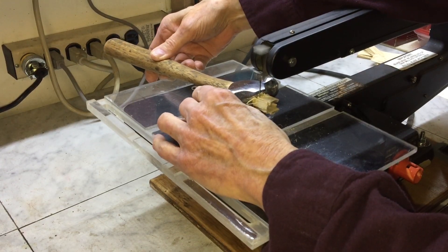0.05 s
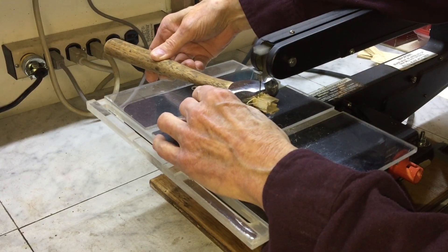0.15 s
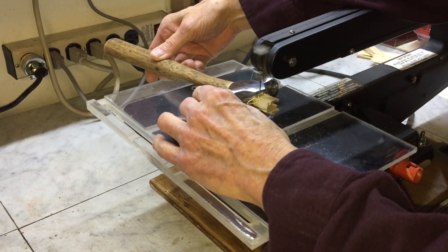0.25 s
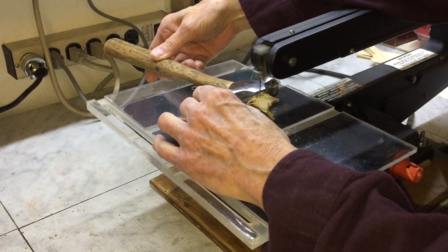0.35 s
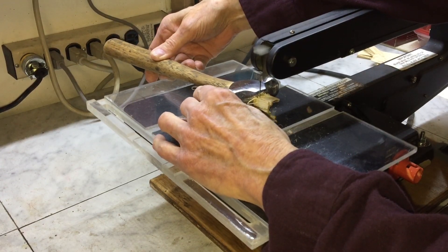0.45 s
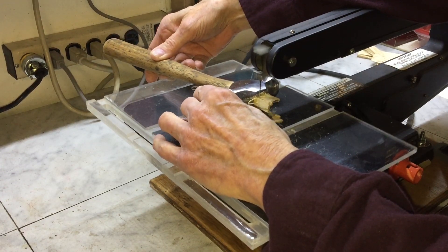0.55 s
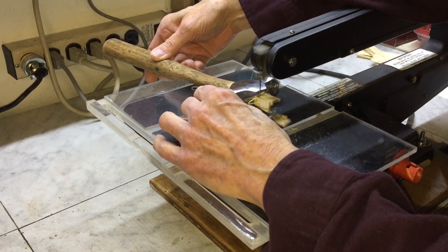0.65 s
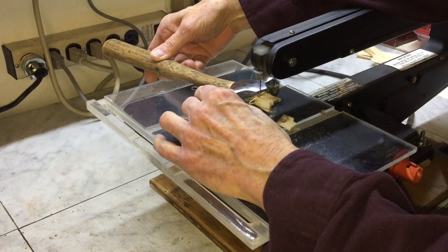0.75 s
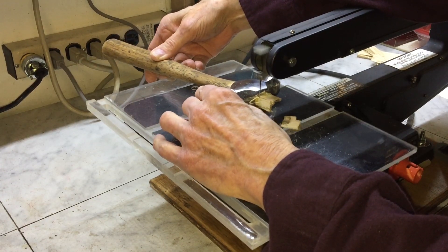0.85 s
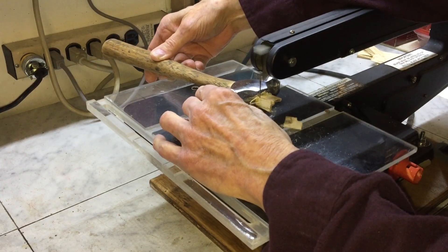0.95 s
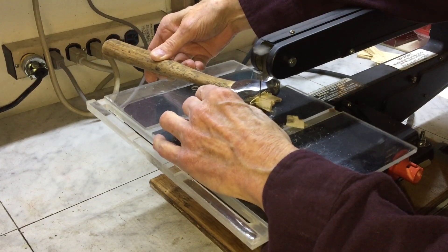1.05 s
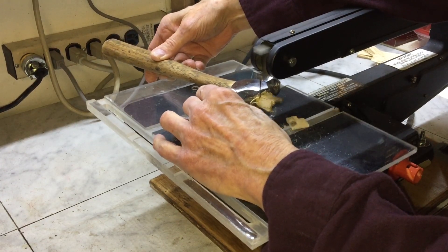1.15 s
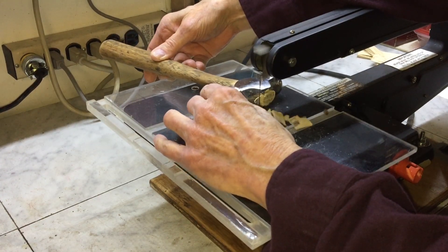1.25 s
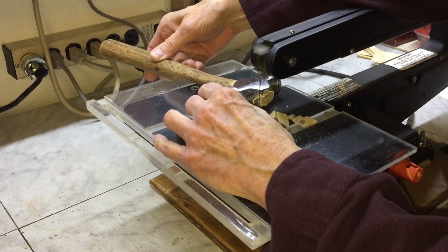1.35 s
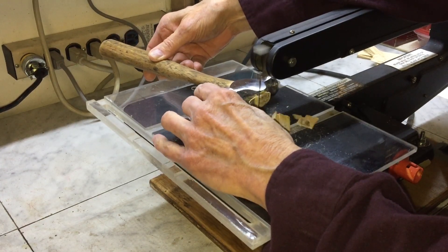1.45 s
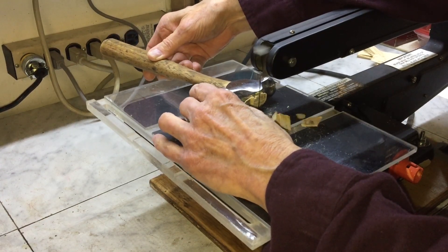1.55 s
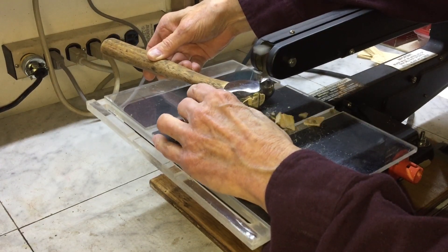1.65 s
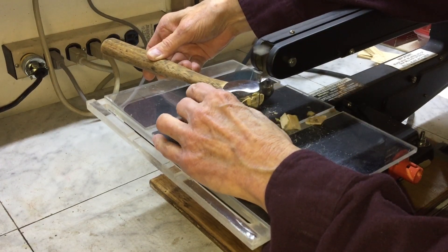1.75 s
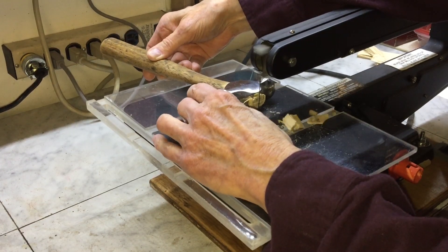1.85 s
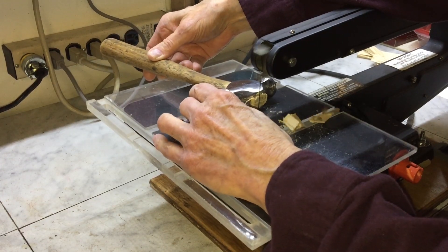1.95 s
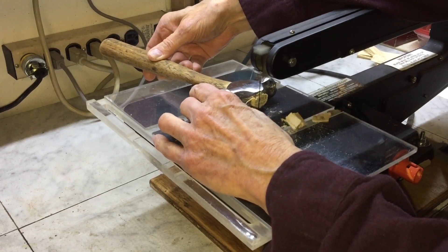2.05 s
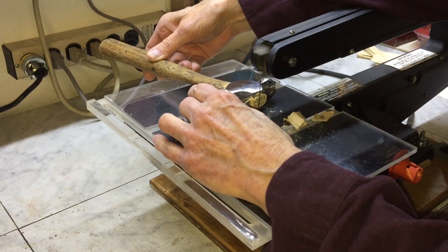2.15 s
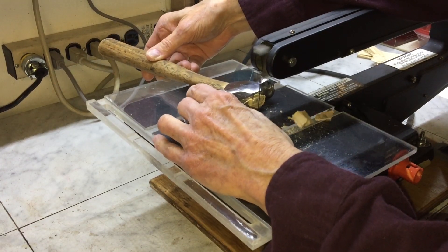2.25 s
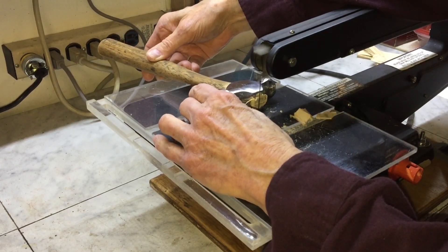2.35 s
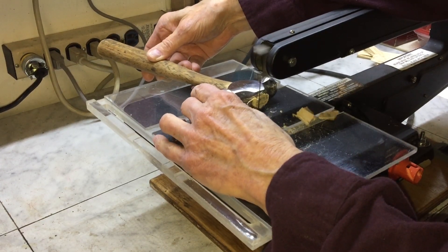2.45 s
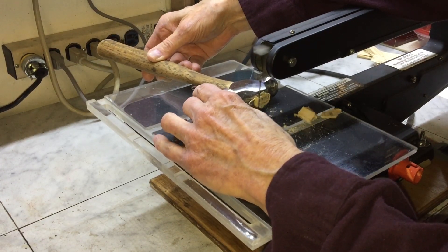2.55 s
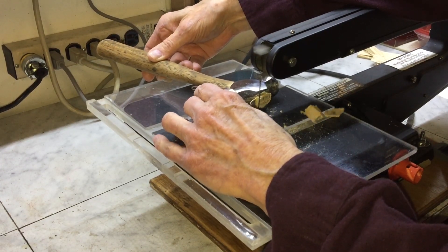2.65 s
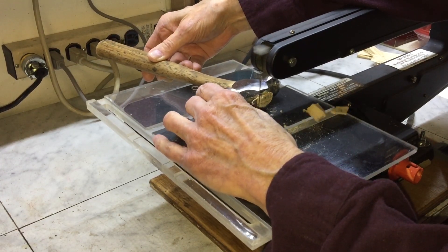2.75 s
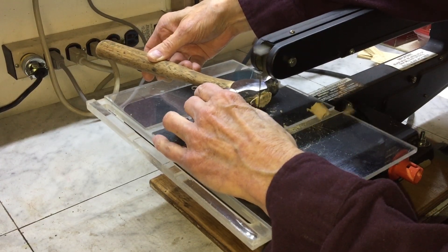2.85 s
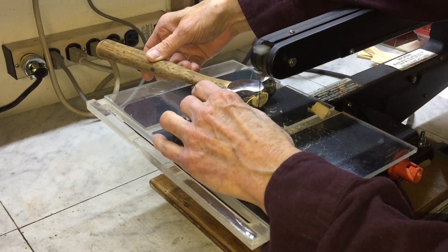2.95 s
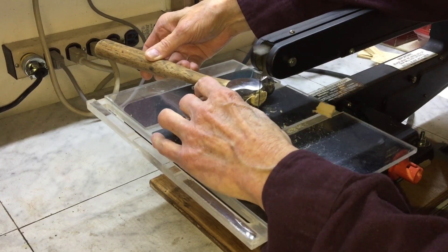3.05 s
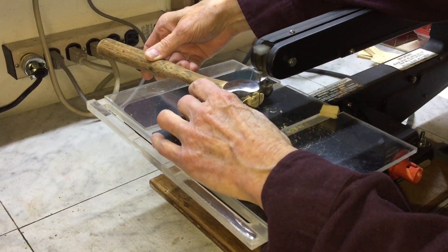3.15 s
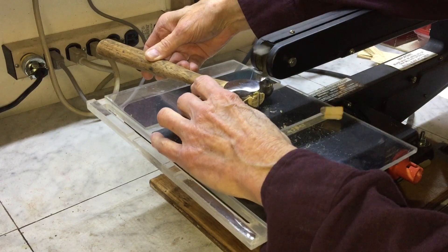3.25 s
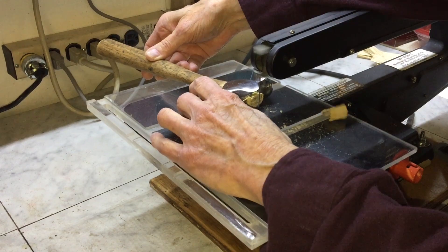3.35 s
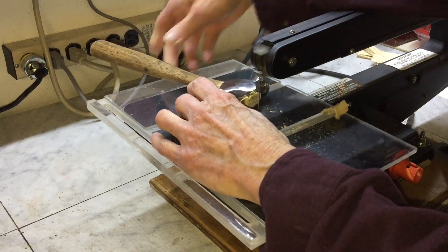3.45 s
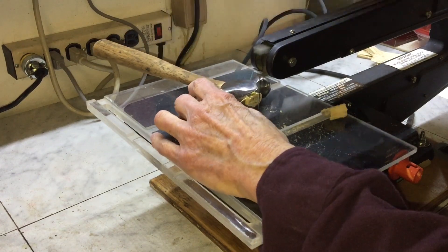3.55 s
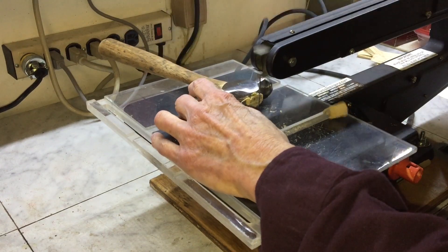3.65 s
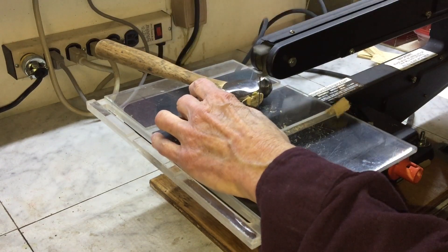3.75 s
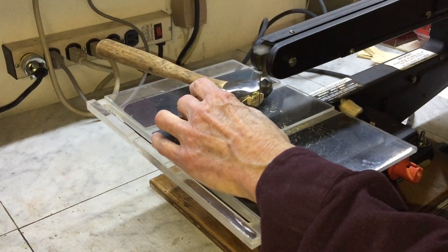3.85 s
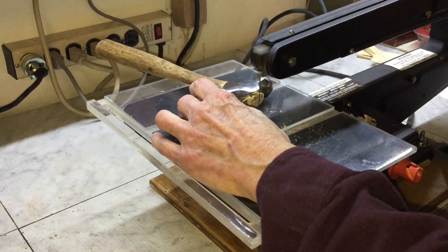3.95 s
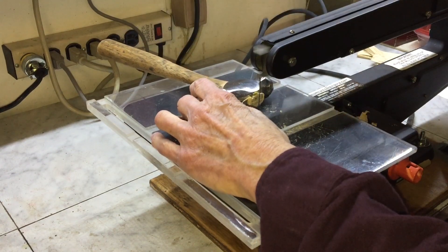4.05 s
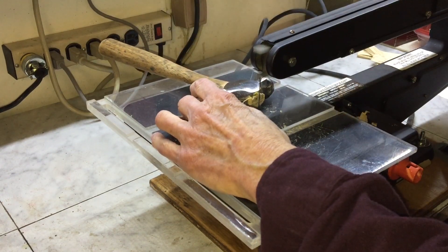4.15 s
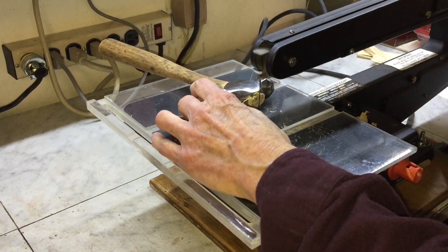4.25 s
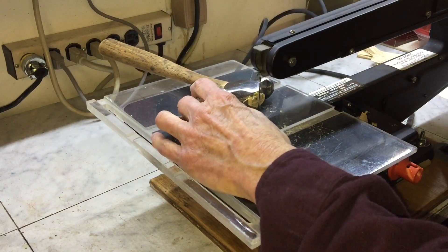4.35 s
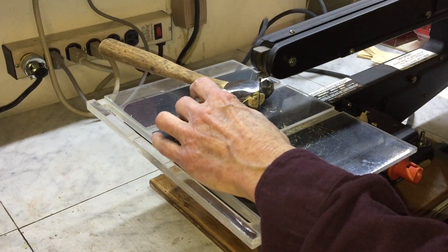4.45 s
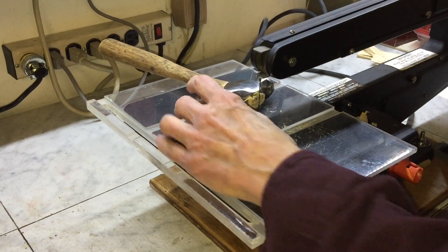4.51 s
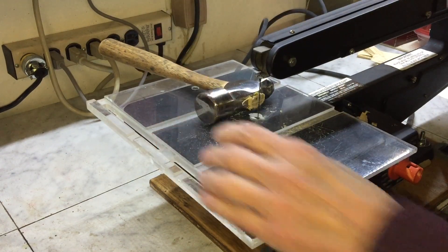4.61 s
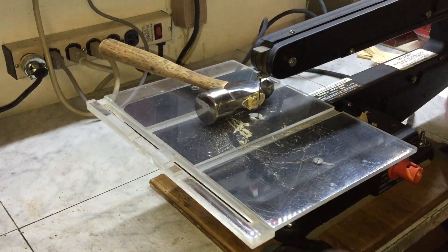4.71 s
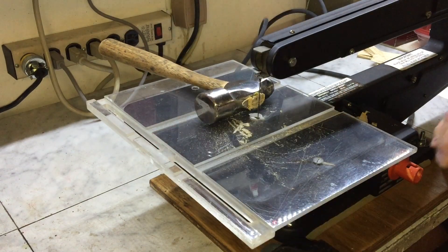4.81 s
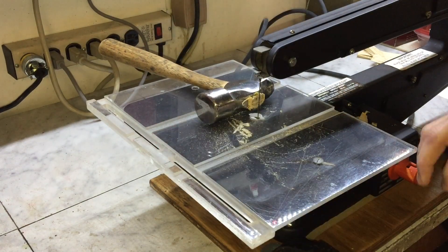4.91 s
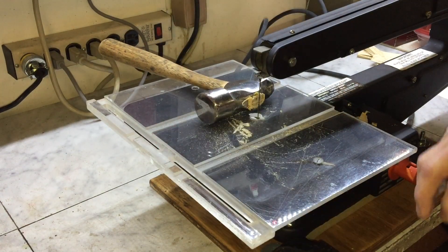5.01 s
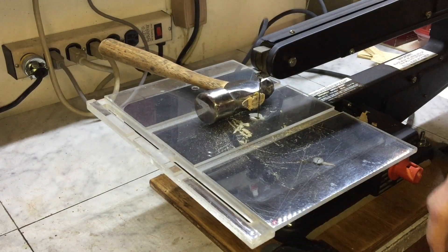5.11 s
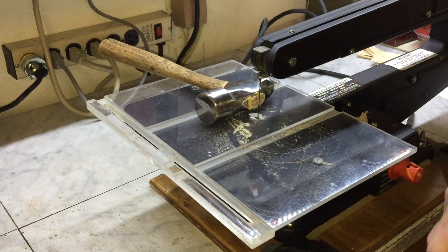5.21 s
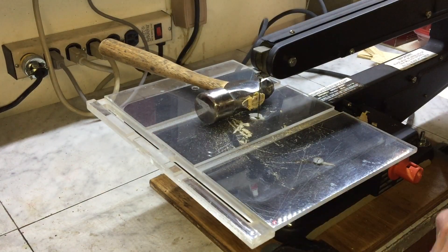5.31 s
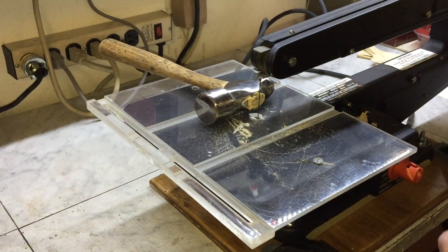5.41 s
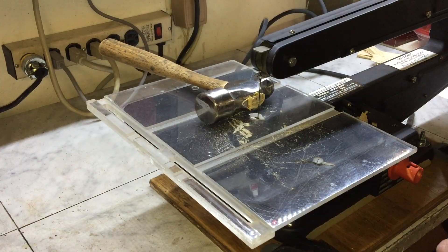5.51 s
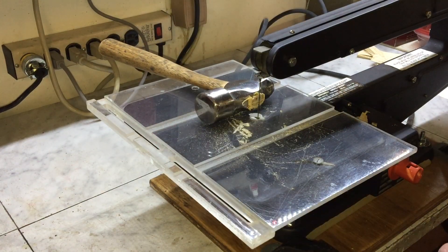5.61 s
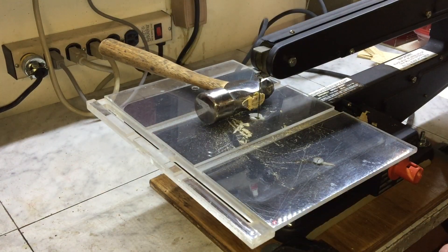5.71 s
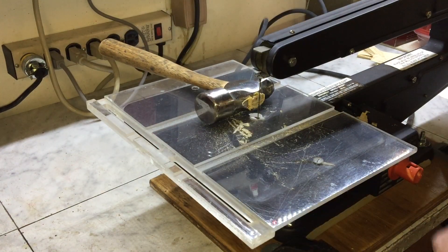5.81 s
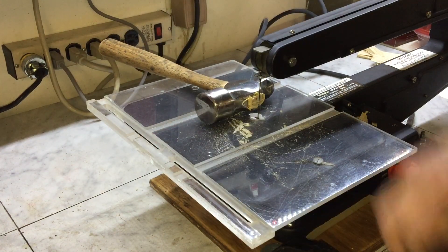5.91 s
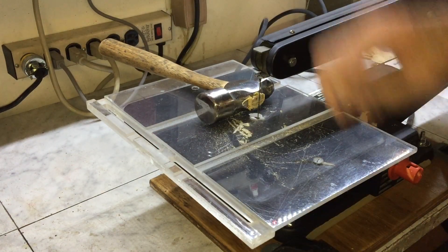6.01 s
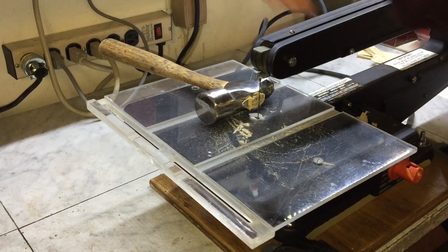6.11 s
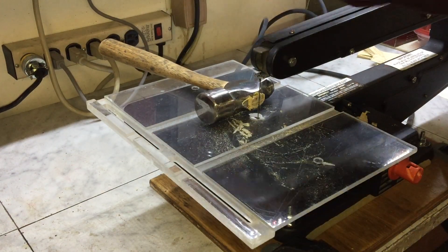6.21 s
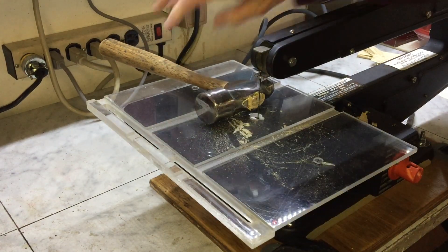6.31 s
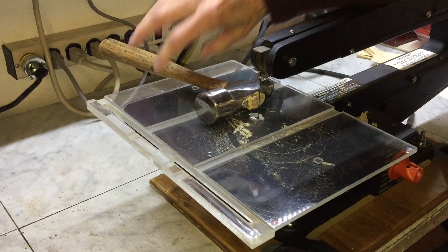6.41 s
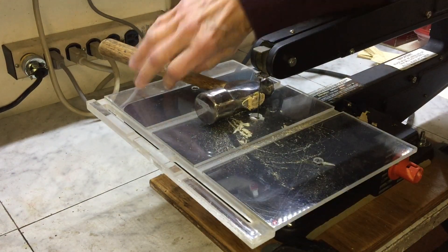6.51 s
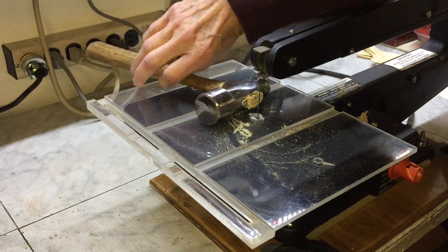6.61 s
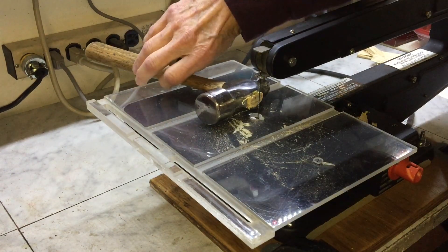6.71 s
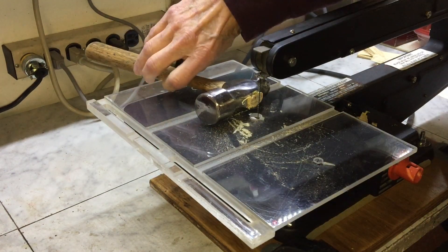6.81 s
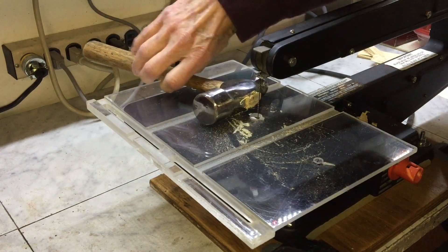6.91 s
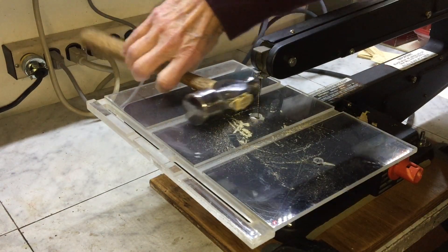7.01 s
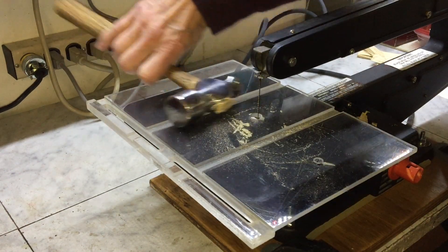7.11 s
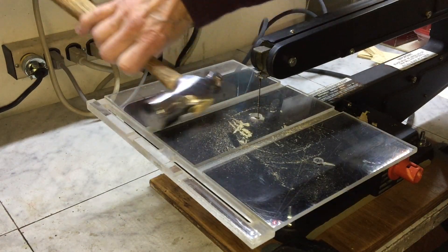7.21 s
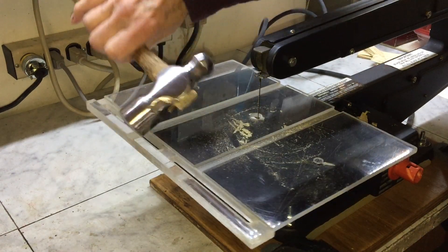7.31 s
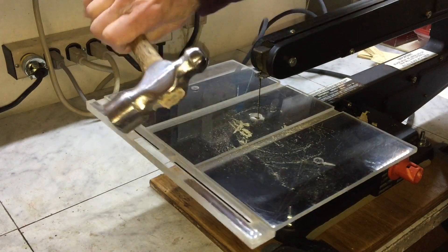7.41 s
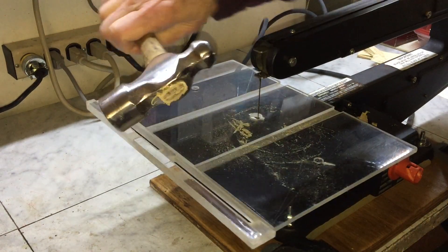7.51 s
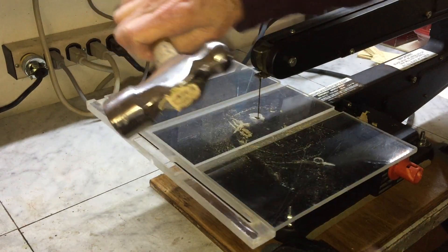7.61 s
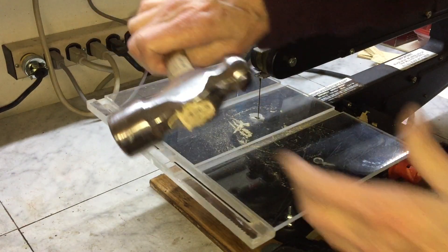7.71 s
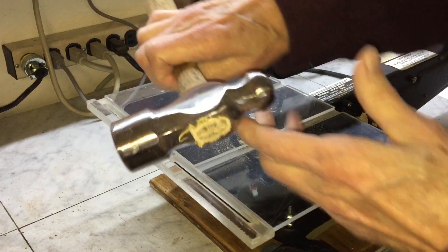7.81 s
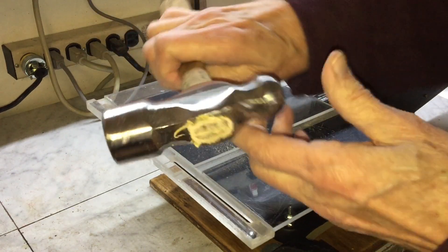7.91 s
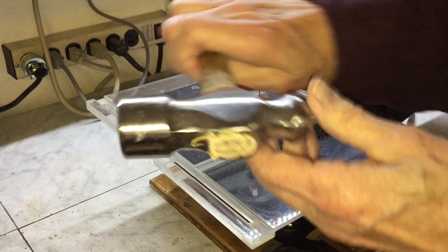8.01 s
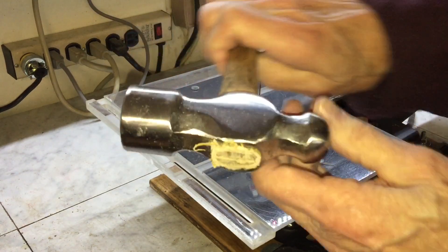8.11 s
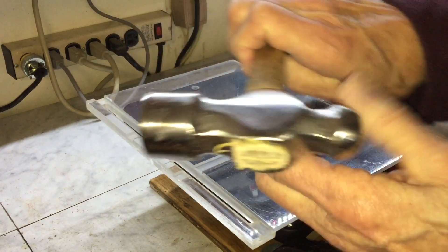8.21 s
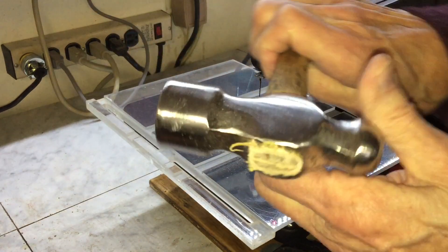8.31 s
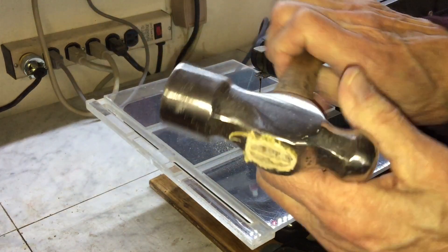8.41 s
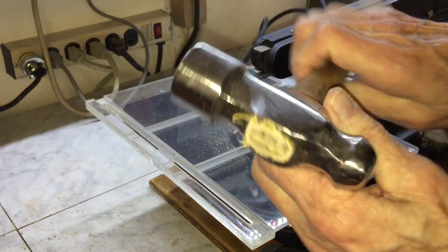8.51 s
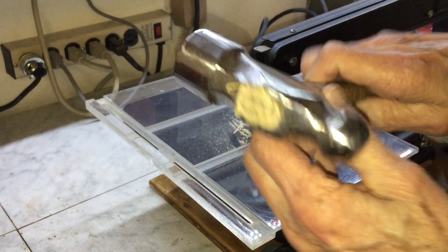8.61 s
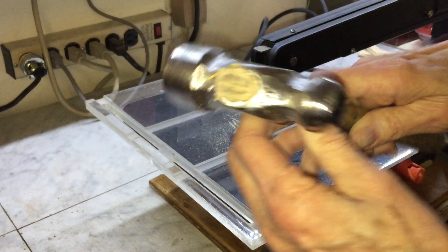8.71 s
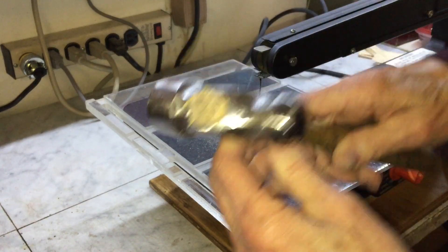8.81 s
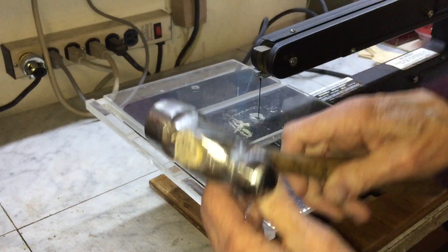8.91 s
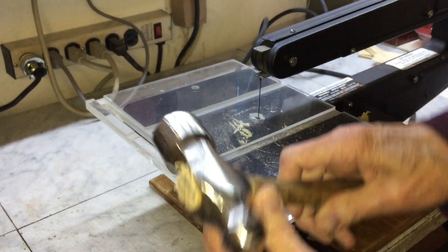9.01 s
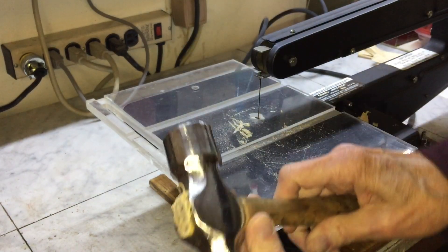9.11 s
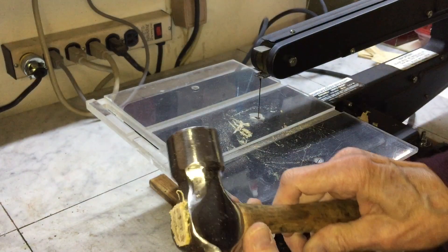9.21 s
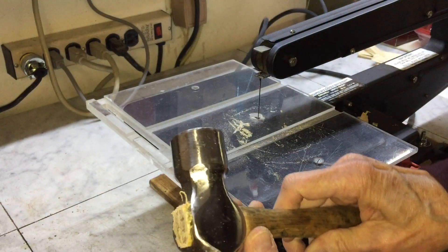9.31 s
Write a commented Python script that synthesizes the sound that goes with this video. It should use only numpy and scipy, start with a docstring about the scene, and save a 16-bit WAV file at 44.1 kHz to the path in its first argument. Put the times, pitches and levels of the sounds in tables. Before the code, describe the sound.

A small benchtop scroll saw buzzes and rattles through wood, breaks free, switches off and winds down fast; later a hammer scrapes and knocks on the table.

```python
"""Small workshop: a benchtop scroll saw trims the wooden stub off a hammer's handle.
Motor harmonics whine, filtered noise pulsing with the strokes is the rattle, a noise burst a stroke is the slap.
The blade breaks through, the saw runs free, is switched off and coasts to rest within half a second.
Then the hammer is dragged off the table as noise and gliding groans, knocks against it as decaying noise
and ringing modes, and is turned over in the hands; switches click, under faint room tone."""
import sys
import numpy as np
from scipy import signal
from scipy.fft import rfft, irfft
from scipy.io import wavfile
from scipy.ndimage import uniform_filter1d

SR = 44100
rng = np.random.default_rng(int(sys.argv[2]) if len(sys.argv) > 2 else 0)


def waveform_to_disk(signal):
    """Save audio, clipped to [-1, 1], as 16-bit WAV at the path in sys.argv[1]."""
    frames = np.transpose(np.atleast_2d(signal))
    scaled = np.clip(frames, -1, 1) * 32767
    samples = np.round(scaled).astype(np.int16)
    wavfile.write(sys.argv[1], SR, samples)


N = 412776
TIME = np.arange(N) / SR

# blade strokes per s, up and down both counted, and how many of them the wood takes away
FREE_HZ, SAG_HZ = 114.6, 1.14
MAINS_PULL_HZ = 120
POWER_OFF_S = 4.097

# arms and bearings, noise spectrum: (frequency [Hz], relative density [dB])
RATTLE_SPECTRUM = [(30, -25), (75, -21.5), (130, -13), (260, -12.5), (380, -2.5), (500, -6.5), (720, 1),
                   (950, -5.5), (1250, 1.5), (1800, 1.5), (2300, -2), (3000, 0), (4200, -6), (6000, -10.5),
                   (9000, -39.5)]
# saw frame resonances: (frequency [Hz], width [Hz], boost or cut [dB])
FRAME = [(179, 2.5, 4.5), (342, 13, 9.5), (405, 29, 6), (558.5, 10, 8), (723, 16, 4.5), (811, 19, 5.5),
         (1205, 63, 1.5), (1385, 27, 3), (1690, 40, -3.5), (1744, 57, 3.5), (1819, 60, 2.5),
         (2220, 50.2, -3.5), (2440, 32, -4.5), (2540, 68, 4), (2760, 90, -3.5), (2890, 220, 5),
         (3200, 120, -5), (3660, 170, 3), (4080, 90, -6.5), (4190, 90, 0.5), (4670, 56, 0.5), (4760, 91, 4),
         (5270, 170, -2.5)]


def from_db(db):
    """Decibels to gain."""
    return 10 ** (np.asarray(db) / 20)


def rms_one(x):
    """Scale to rms 1."""
    return x / np.sqrt(np.mean(x ** 2) + 1e-20)


def in_time(rows):
    """Each column of a curve at every sample."""
    s, *columns = np.transpose(rows)
    return [np.interp(TIME, s, column) for column in columns]


def at_hz(points, hz):
    """Read a table on a log-frequency axis."""
    table_hz, values = np.array(points).T
    return np.interp(np.log(hz + 1e-3), np.log(table_hz), values)


def onset(start_s, length_s):
    """Rise from 0 to 1 in a straight line."""
    return np.clip((TIME - start_s) / length_s, 0, 1)


def spell(start_s, end_s, edge_s):
    """1 between start and end, 0 outside, with sloping edges."""
    return onset(start_s - edge_s / 2, edge_s) * (1 - onset(end_s - edge_s / 2, edge_s))


def bump(s, scale_s):
    """Gaussian swell of height 1."""
    return np.exp(-((TIME - s) / scale_s) ** 2)


def hiss():
    """White noise."""
    return rng.standard_normal(N)


def drift(rate_hz):
    """Random wander around 0: straight lines between normal draws, holding the last of 4096."""
    knots = rng.standard_normal(4096)
    return np.interp(TIME * rate_hz, np.arange(len(knots)), knots)


def band(x, low_hz, high_hz, order=2):
    """Butterworth band-pass."""
    edges_hz = [low_hz, min(high_hz, .45 * SR)]
    return signal.sosfilt(signal.butter(order, edges_hz, "band", fs=SR, output="sos"), x + 1e-18)


def colour(x, spectrum, size=8192):
    """Minimum-phase filter with the given spectrum; white noise keeps its power."""
    bins_hz = np.arange(size // 2 + 1) * SR / size
    magnitude = rms_one(from_db(at_hz(spectrum, bins_hz)))
    cepstrum = irfft(np.log(magnitude))
    cepstrum[1:size // 2] *= 2
    cepstrum[size // 2 + 1:] = 0
    return signal.oaconvolve(x, irfft(np.exp(rfft(cepstrum))))[:len(x)]


def resonate(x, hz, width_hz):
    """Two-pole resonance with gain 1 on top."""
    r = np.exp(-np.pi * width_hz / SR)
    poles = [1, -2 * r * np.cos(2 * np.pi * hz / SR), r * r]
    return signal.lfilter([(1 - r * r) / 2, 0, (r * r - 1) / 2], poles, x + 1e-18)


def resonances(x, table):
    """Lift or hollow the sound at each resonance of a body."""
    return x + sum((from_db(db) - 1) * resonate(x, hz, width_hz) for hz, width_hz, db in table)


def clicks(times_s, levels_db):
    """One impulse for each event."""
    out = np.zeros(N)
    out[np.round(np.asarray(times_s) * SR).astype(int)] = from_db(levels_db)
    return out


def fade(impulses, decay_s):
    """Each impulse starts an exponential decay of its own height."""
    return signal.lfilter([1], [1, -np.exp(-1 / (decay_s * SR))], impulses + 1e-18)


def ring(impulses, hz, t60_s):
    """A unit impulse sets a decaying sine of initial height 1 ringing."""
    r, w = from_db(-60 / (t60_s * SR)), 2 * np.pi * hz / SR
    return signal.lfilter([0, np.sin(w)], [1, -2 * r * np.cos(w), r * r], impulses + 1e-18)


def each_stroke(strokes):
    """Samples at which a new stroke begins."""
    return np.flatnonzero(np.diff(np.maximum.accumulate(np.floor(strokes))) > 0)


def saw(slide=0.14, loose_slide=0.23):
    """Speed and load drive every part of the machine."""
    # part levels: (running free [relative dB], added in wood [dB], added with power off [dB],
    # power of the speed that the level follows [-])
    rumble_law = (-33, 2, 0.5, 1.63)
    rattle_law = (-28, 0.1, -7, 1)
    slap_law = (-35.5, 1.5, -3.5, 1.74)
    # blade snags and jerks the work: (time [s], time scale [s], added rumble [dB], clatter [dB], rasp [dB])
    snags = [(0.07, 0.04, 0, -1, 6), (0.5, 0.13, 2, 2, -1.5), (.657, 0.015, 5.5, -2, 6.5),
             (.688, 0.013, 6, -0.5, 4.5), (0.834, 0.025, 8, 3.5, 0), (0.909, 0.011, 5.5, -8, 1),
             (0.965, .03, 1.5, 0, 0.5), (1.22, 0.036, 4.5, -1, 3.5)]
    breakthrough_s, breakthrough_length_s = 1.235, 0.03
    # one hand lets go of the handle, so the work slaps less
    let_go_s, let_go_slap_db = 3.42, -1.5

    load = 1 - onset(breakthrough_s, breakthrough_length_s)
    loose = onset(let_go_s - 0.04, 0.055)
    speed_hz = motor_speed(load)
    strokes = np.cumsum(speed_hz) / SR
    rumble_db = shake_db(rumble_law, speed_hz, load)
    rattle_db = shake_db(rattle_law, speed_hz, load)
    slap_db = shake_db(slap_law, speed_hz, load) + let_go_slap_db * loose
    snag_db = 0
    for s, scale_s, low_db, clatter_db, teeth_db in snags:
        jerk = bump(s, scale_s)
        rumble_db = rumble_db + low_db * jerk
        rattle_db = rattle_db + clatter_db * jerk
        slap_db = slap_db + clatter_db * jerk
        snag_db = snag_db + teeth_db * jerk
    # between slaps the work slides and hisses: more at speed, and more loose on the driven table
    sliding = slide * (.1 + 0.899 * speed_hz / FREE_HZ)
    sliding = sliding + loose_slide * loose * (1 - onset(POWER_OFF_S, 0.03))
    clatter = rattle(strokes, speed_hz, load, rumble_db, rattle_db, snag_db)
    clatter = clatter + taps(strokes, speed_hz) + slaps(strokes, load, loose, sliding, slap_db) + jolts()
    tones = whine(strokes, speed_hz, load, loose) + shudder(strokes, speed_hz) + squeak(strokes)
    return tones + workshop(clatter, wet_db=-10.0)


def motor_speed(load):
    """Strokes per s: wood slows the motor a little; unpowered, dry friction and speed drag brake it to rest."""
    friction_hz_per_s, drag_time_s = 228, 0.71
    coasted_s = np.maximum(TIME - POWER_OFF_S, 0)
    friction_hz = friction_hz_per_s * drag_time_s
    start_hz = FREE_HZ - SAG_HZ * load
    return np.maximum((start_hz + friction_hz) * np.exp(-coasted_s / drag_time_s) - friction_hz, 0)


def shake_db(law, speed_hz, load, release_s=0.026):
    """Level of a part of the mechanism: shifted in wood and without drive, and falling with the speed."""
    free_db, wood_db, off_db, exponent = law
    speed_db = exponent * 20 * np.log10(speed_hz / FREE_HZ + 1e-4)
    return free_db + wood_db * load + off_db * onset(POWER_OFF_S, release_s) + speed_db


def whine(strokes, speed_hz, load, loose, waver=0.091, coast_fall=2.8, ripple=0.42):
    """Multiples of the stroke rate; the rotor slips behind the mains: beating side tones while power is on."""
    # whine in wood and running free: (multiple of the stroke rate [-], relative level [dB])
    cutting_levels = dict([(1, -7), (2, -14.5), (3, -11), (4, -20), (5, -15.5), (6, -15.5), (7, -6),
                           (8, -15.5), (9, 0), (10, -13.5), (11, -12), (12, -13), (13, -16), (14, -21),
                           (15, -11.5), (16, -16), (17, -16.5), (18, -9.5), (20, -17.5), (22, -22),
                           (31, -27)])
    free_levels = [(1, -7), (2, -22.5), (3, -6), (4, -16), (5, -8.5), (6, -16.5), (7, -7.5), (8, -25),
                   (9, -0.5), (10, -21), (11, -23), (12, -12), (13, -15), (14, -16), (15, -8.5),
                   (16, -14.5), (17, -12.5), (18, -10.5), (19, -25), (20, -13), (21, -23), (22, -15.5),
                   (24, -16), (25, -9.5), (26, -15), (27, -19), (29, -23.5), (30, -19), (31, -13),
                   (32, -21.5), (33, -18.5), (34, -21.5), (36, -17), (37, -23), (38, -21.5), (41, -26.5),
                   (43, -15.5), (45, -21.5), (48, -27.5)]
    # multiples that change once the hand lets go: (multiple [-], added level [dB])
    let_go_levels = dict([(5, 2.5), (7, 2.5), (15, 0.5), (16, -6), (17, -6), (18, 6), (19, 4.5), (25, -1),
                          (27, 10.5), (33, -6.5), (36, -6), (41, 3.5), (45, 4.5)])
    # magnetic tones beside the whine: (multiple of the stroke rate [-], level running free [dB])
    magnetic_levels = [(3, -34), (5, -41), (7, -40.5), (8, -41), (10, -41), (12, -40.5), (14, -32),
                       (15, -39.5), (16, -39), (20, -38.5), (22, -37), (31, -38)]
    cutting_trim_db, whine_trim_db, magnetic_wood_db = 3.5, -25, -3.0
    # the frame hums up briefly on the third multiple
    swell_s, swell_scale_s, swell_db = .572, .03, 11

    power = 1 - onset(POWER_OFF_S - 0.005, 0.011)
    pace = speed_hz / FREE_HZ
    slip = MAINS_PULL_HZ * TIME - strokes
    beat = np.exp(4j * np.pi * slip)
    out = np.zeros(N)
    for k, free_db in free_levels:
        cutting_db = cutting_levels.get(k, free_db - 5.0) + cutting_trim_db
        gain = load * from_db(cutting_db) + (1 - load) * from_db(free_db)
        gain = gain * from_db(loose * let_go_levels.get(k, 0))
        if k == 3:
            gain = gain * from_db(swell_db * bump(swell_s, swell_scale_s))
        # the pulsing torque shakes the phase of the high multiples most
        shake = ripple * min(k / 24, 1) ** 2 * np.real(beat * np.exp(2j * np.pi * rng.random()))
        # high multiples die first as the motor slows
        gain = gain * pace ** (coast_fall * k)
        phase = 2 * np.pi * (k * strokes + rng.random()) + shake + waver * (k / 9) ** 1.2 * drift(23)
        out += gain * (1 + waver * drift(25)) * np.sin(phase)
    out *= from_db(whine_trim_db)
    for k, db in magnetic_levels:
        phase = 2 * np.pi * (round(k) * strokes + 2 * slip + rng.random()) + waver * drift(23)
        out += power * from_db(db + magnetic_wood_db * load) * np.sin(phase)
    # the small frame radiates little deep bass
    return band(out, 90, 12000, order=7)


def rattle(strokes, speed_hz, load, rumble_db, rattle_db, snag_db, depth=0.22, bite=0.19, split_hz=2200):
    """Play in arms and bearings shakes the frame on every stroke; the teeth add a rasp while in wood."""
    low_trim_db, high_trim_db, rasp_db, grain_db = 6.0, 2.5, -33.0, 2.5
    # slow strokes part into single clatters; in wood the cutting stroke is the stronger one
    slowness = np.clip(2.1 * (1 - speed_hz / FREE_HZ), 0, 1)
    cutting_stroke = 1 + bite * load * np.cos(np.pi * (strokes - 0.75))
    stroke_pulse = 1 + (depth + 0.36 * slowness) * np.cos(2 * np.pi * (strokes - .7))
    pulsing = cutting_stroke * stroke_pulse * from_db(1.0 * drift(110))
    noise = rms_one(resonances(colour(hiss() * pulsing, RATTLE_SPECTRUM), FRAME))
    low = signal.sosfiltfilt(signal.butter(2, split_hz, fs=SR, output="sos"), noise)

    teeth = hiss() * cutting_stroke ** 2 * from_db(grain_db * drift(400))
    rasp = resonate(teeth, 1075, 38) + .5 * resonate(teeth, 690, 45)
    rasp = rasp + 0.15 * resonate(teeth, 1900, 400) + 0.32 * resonate(teeth, 2900, 130)
    shaken = from_db(rumble_db + low_trim_db) * low + from_db(rattle_db + high_trim_db) * (noise - low)
    return shaken + from_db(rasp_db + snag_db) * load * rms_one(rasp)


def slaps(strokes, load, loose, sliding, slap_db, scatter_db=1.5, decay_s=0.0028, free_ring=0.5, size=600):
    """Each stroke lifts the work and slaps it back on the table, less surely on the return, sharper in wood."""
    # slap spectrum: (frequency [Hz], relative density [dB])
    slap_spectrum = [(2650, -31.5), (4500, -11.5), (4870, -3.5), (5440, -14.5), (6500, 0), (7150, -2.5),
                     (7900, -3), (8700, -2.5), (9640, -6), (10300, -5), (13400, -7.5), (14500, -12.5),
                     (15600, -13.5), (15800, -19.5)]
    # table under the slaps: (frequency [Hz], width [Hz], boost or cut [dB])
    table_top = [(5800, 200, -4.5), (6200, 300, 3), (7200, 400, -4), (8760, 390, 8), (9200, 180, 3),
                 (9750, 310, -1), (12600, 370, 3.5), (13560, 300, 7), (14300, 500, -4)]
    # spells in which the work bounces on the return stroke too: (start [s], end [s])
    bounce_spells = [(0.03, .63), (0.7, .87), (1.18, 1.25), (1.52, 3.4), (4.18, 4.55)]
    # where in the stroke the work lands, as the hands shift it: (time [s], share of the stroke [-])
    forward_landing = [(0, .8), (.35, .7), (.65, .45), (1.15, .57), (1.5, .5), (1.8, .64), (2.1, .65),
                       (2.35, .54), (2.85, .82), (3.05, .46), (3.8, .7), (4.22, .45), (4.36, .58)]
    return_landing = [(0, .48), (.35, .45), (.66, .75), (1.5, .75), (1.65, .56), (3.1, .56), (3.35, .75),
                      (4.22, .45), (4.36, .58)]
    # return slap against the forward slap
    return_bouncing_db, return_held_db = -2.5, -14.5
    snap_db, wood_bright_db, clack_db, wood_clack_db = -9.0, 1.0, 4.0, 4.5
    alike_share = .45

    forward = each_stroke((strokes - in_time(forward_landing)[0]) / 2)
    back = each_stroke((strokes - 1 - in_time(return_landing)[0]) / 2)
    at = np.concatenate([forward, back])
    bouncing = sum(spell(start_s, end_s, 0.04) for start_s, end_s in bounce_spells)
    return_db = return_held_db + (return_bouncing_db - return_held_db) * bouncing
    chance = rng.standard_normal((1024, 2))[:len(at)]
    times_s = np.maximum(TIME[at] + .00006 * chance[:, 1], 0)
    blows = clicks(times_s, return_db[at] * np.isin(at, back) + scatter_db * chance[:, 0])

    # each slap rings partly like the last one and partly in its own way
    common_ring = rng.standard_normal(size) * np.exp(-TIME[:size] / decay_s)
    alike = signal.oaconvolve(blows, common_ring)[:N]
    snaps = alike_share * alike + (1 - alike_share) * fade(blows, decay_s) * hiss()
    bursts = snaps + sliding * hiss()
    # levelled to the local rms
    gain = from_db(slap_db) / np.sqrt(uniform_filter1d(bursts ** 2, size=3000))

    bright = from_db(snap_db + wood_bright_db * load) * band(gain * snaps, 12000, 22000)
    clack = resonances(band(gain * bursts, 2500, 3800), FRAME)
    top = bright + colour(gain * snaps, slap_spectrum)
    slither = colour(gain * (bursts - snaps), slap_spectrum)
    # the table's resonances speak most while the blade presses the work onto it
    pressed = (free_ring + (1 - free_ring) * load) * (1 - loose)
    landed = pressed * resonances(top, table_top) + (1 - pressed) * top
    return landed + slither + from_db(clack_db + wood_clack_db * load) * clack


def taps(strokes, speed_hz, tap_db=-19.0, decay_s=0.0009, beat_db=2.5, low_hz=1400, high_hz=4200):
    """The crank takes up its play with a sharp tap a stroke, throbbing as the rotor slips behind the mains."""
    at = each_stroke(strokes - .78)
    throb = np.cos(4 * np.pi * (MAINS_PULL_HZ * TIME - strokes))
    blows = clicks(TIME[at], tap_db + beat_db * throb[at]) * (speed_hz / FREE_HZ) ** 3
    return resonances(band(fade(blows, decay_s) * hiss(), low_hz, high_hz), FRAME)


def jolts(trim_db=-7.5, decay_s=0.0077, top_hz=3000):
    """The slowing arms drop through their play and knock the frame."""
    # knocks of the arms as the saw runs down: (time [s], relative level [dB])
    s, db = np.transpose([(4.112, -23), (4.139, -19), (4.18, -18), (4.193, -21), (4.208, -23), (4.22, -21),
                          (4.235, -21), (4.25, -34), (4.286, -33), (4.312, -34), (4.349, -28), (4.383, -30),
                          (4.409, -31), (4.458, -40)])
    bursts = fade(clicks(s, db + trim_db), decay_s) * hiss()
    return resonances(band(colour(bursts, RATTLE_SPECTRUM), 150, top_hz, order=1), FRAME)


def shudder(strokes, speed_hz, uneven_db=4.5, weak_hz=57, fall=3.2, low_hz=100):
    """While the motor coasts, each slow stroke kicks bench and frame, more weakly towards the end."""
    # bench and frame modes: (frequency [Hz], relative level [dB], t60 [s])
    bench_modes = [(128, -37, .24), (172, -40, .12), (232, -43.5, .14), (339.8, -43, 0.13)]
    at = each_stroke(strokes - .45)
    slowed = np.clip((FREE_HZ - SAG_HZ - speed_hz) / 35, 0, 1) ** 2
    force = slowed * np.clip(speed_hz / weak_hz, 0, 1) ** fall
    rings = np.zeros(N)
    for hz, db, t60_s in bench_modes:
        kicks = force * clicks(TIME[at], db + uneven_db * rng.standard_normal(len(at)))
        rings += ring(kicks, hz, t60_s)
    return band(rings, low_hz, 2000, order=4)


def squeak(strokes):
    """On its last slow strokes the blade rubs thinly in its guide, pausing at each turn and fading."""
    start_s, end_s, squeak_hz, squeak_db = 4.345, 4.468, 11930, -59
    sliding = spell(start_s, end_s, .012) * np.abs(np.cos(np.pi * strokes)) * (1 - onset(start_s, .16))
    return from_db(squeak_db) * sliding * np.sin(2 * np.pi * squeak_hz * TIME + .6 * drift(200))


def switches(snap_trim_db=-10.5, decay_s=0.0053, spring_s=0.016, low_hz=700):
    """A sprung contact snaps over and bounces, the spring shivers on and the small plastic case rings."""
    # snaps and bounces: (time [s], relative snap level [dB], spring level [dB], case level [dB])
    s, snap_db, spring_db, case_db = np.transpose([(4.087, -2, -47, -33), (6.427, -32.5, -53, -55),
                                                   (6.4348, -42, -62, -51), (6.4484, -24.5, -44, -43.5),
                                                   (6.467, -44, -63, -51), (6.474, -44, -64, -55),
                                                   (6.498, -43, -63, -70)])
    # snap spectrum: (frequency [Hz], relative density [dB])
    snap_spectrum = [(250, -26.5), (550, -29), (1000, -8), (1500, -9.5), (2500, -1), (3100, -4),
                     (4400, -8.5), (7000, -4), (8700, -6.5), (10500, -8), (12500, -9.5), (15800, -12.5)]
    # hollow of the housing: (frequency [Hz], width [Hz], boost or cut [dB])
    cavity = [(1760, 90, 6.5), (2475, 130, 4.5), (2850, 250, -9.5), (3870, 190, 4.5), (5643, 120, 5.5),
              (7250, 230, 4.5), (7650, 200, -8.5), (8620, 200, 7.5), (9700, 250, 3.5), (10600, 320, -8),
              (11730, 300, -8.5), (12050, 250, 8.5), (14000, 230, 7)]
    # case modes: (frequency [Hz], relative level [dB], t60 [s])
    case_modes = [(811, -11, .16), (1027, -7, 0.17), (1410, -2.5, 0.11), (1798, 1.5, 0.109),
                  (2132, -1, 0.16), (2420, -5.5, 0.18), (2579, -6.5, .18), (3160, -10.5, .15),
                  (3720, -9, 0.098), (5650, -12, 0.1383), (8980, -14, 0.15)]

    contact = fade(clicks(s, snap_db + snap_trim_db), decay_s)
    spring = fade(clicks(s, spring_db), spring_s)
    snap = colour((contact + spring) * hiss(), snap_spectrum)
    case = sum(ring(clicks(s, case_db + db) * np.sign(hiss()), hz, t60_s) for hz, db, t60_s in case_modes)
    return band(resonances(snap, cavity) + case, low_hz, 19000, order=3)


def drag(sliding_groan_db=-54.0, grain_db=2.5, catch_s=0.012, uneven_db=2.5):
    """The hammer head sticks and slips over sawdust, hisses less as it is lifted, groans upwards where it catches."""
    # noise spectra of groan and hiss: (frequency [Hz], relative density [dB])
    groan_spectrum = [(120, -29), (200, -10), (300, -3), (447, -20), (582, -16), (700, -4), (833, -9),
                      (1180, -9), (1520, -10), (2500, -17), (5500, -67)]
    hiss_spectrum = [(1180, -36), (2000, -11), (2500, -6), (2850, -9), (3550, -11), (4200, -9), (5000, -20),
                     (6400, -11), (7200, -13), (15000, -30)]
    # catches: (start [s], end [s], relative level [dB], first pitch [Hz], last pitch [Hz])
    catches = [(7.171, 7.193, -46, 650, 780), (7.299, 7.334, -45, 678, 808), (7.337, 7.42, -48.5, 797, 870)]
    start_s, end_s, rise_s = 7.105, 7.42, 0.067
    # relative level at first, and its fall as the weight comes off
    first_hiss_db, fade_db_per_s = -51, 45

    touching = onset(start_s, rise_s) * (1 - onset(end_s, catch_s))
    slips = touching * rms_one(hiss() * from_db(grain_db * drift(350) + uneven_db * drift(60)))
    hiss_db = first_hiss_db - fade_db_per_s * np.maximum(TIME - start_s - rise_s, 0)
    out = colour(slips * touching ** 2 * from_db(sliding_groan_db), groan_spectrum)
    out += colour(slips * from_db(hiss_db), hiss_spectrum)
    for from_s, to_s, db, from_hz, to_hz in catches:
        phase = 2 * np.pi * np.cumsum(np.interp(TIME, [from_s, to_s], [from_hz, to_hz])) / SR
        groan = drift(400) * np.sin(phase) + drift(400) * np.cos(phase)
        out += from_db(db) * spell(from_s, to_s, catch_s) * groan
    return out


def knocks():
    """Steel meets the plastic table: a tick and a crack, then the table's modes and a thud and boom of the bench."""
    # blows: (time [s], relative crack level [dB], panel level [dB], body level [dB], tick level [dB])
    s, crack_db, panel_db, body_db, tick_db = np.transpose([(4.662, -63.5, -75, -80, -58),
                                                            (4.812, -38, -58, -50.5, -66),
                                                            (7.129, -49, -65, -72, -43),
                                                            (7.193, -27, -43, -33, -36),
                                                            (7.201, -28, -46, -34.5, -51),
                                                            (7.282, -39, -52, -48, -36),
                                                            (7.311, -51, -52, -65, -44),
                                                            (7.354, -42, -60, -63, -50),
                                                            (7.417, -15, -25, -38, -42),
                                                            (7.425, -36, -39, -31.5, -60),
                                                            (7.431, -32, -42, -38, -58),
                                                            (7.474, -37.5, -54, -57, -63),
                                                            (9.217, -53, -59, -56, -55)])
    # noise spectra: (frequency [Hz], relative density [dB])
    crack_spectrum = [(300, -26), (650, 2.5), (850, -1), (1200, -6), (1600, 3.5), (1850, 4), (2300, -14),
                      (2650, -9.5), (3000, -3.5), (3500, -16.5), (7000, -28), (15000, -43)]
    thud_spectrum = [(25, -29), (55, -11), (115, -7), (175, 0.5), (230, -4.5), (320, 6), (470, -11),
                     (750, -1.5), (1200, -33), (2600, -59)]
    # table modes: (frequency [Hz], relative level [dB], t60 [s])
    table_modes = [(53.7, -17, 0.83), (88, -18, 0.65), (125.4, -21, 0.4), (166.8, -8, 0.31),
                   (260, -13, 0.31), (306, -4.5, 0.62), (298, -22, 3.2), (314, -33, 2.45), (351, -3, 0.25),
                   (633, -13, 0.36), (727, -15, 0.33), (822, 0, 0.28), (1000, -5, 0.13), (1340, -21, .21),
                   (1570, -4, 0.12), (1763, 11, 0.031), (1640, -5, .16), (1850, -14, 0.2),
                   (1970, -20, 0.24)]
    hard_db, ring_trim_db = -10.5, -11.0

    def burst(levels_db, decay_s):
        """Decaying noise at each blow."""
        return fade(clicks(s, levels_db), decay_s) * hiss()

    out = colour(burst(crack_db - 6.5, 0.006), crack_spectrum)
    out += band(burst(tick_db + 2.5, 0.0033), 2300, 8600)
    out += colour(burst(body_db - 1.0, 0.013), thud_spectrum)
    out += band(burst(body_db + 5.0, 0.075), 39, 105)  # boom
    # the saw's frame shivers on after the blow
    out += resonances(band(burst(body_db - 21, 0.14), 270, 1030), FRAME)
    for hz, db, t60_s in table_modes:
        # low modes follow the weight of the blow, middle ones where it lands, high ones its hardness
        drive_db = body_db if hz < 450 else panel_db if hz < 1100 else crack_db + hard_db
        levels_db = drive_db + db + ring_trim_db + rng.normal(0, 1.7, len(s))
        out += ring(clicks(s, levels_db), hz, t60_s) * rng.choice([-1, 1])
    return out


def rubs(table, grain_db=3.5, size=32768):
    """Each brush of skin or cloth is a short swell of grainy friction noise."""
    out, hz = np.zeros(N), np.arange(1, size // 2 + 2) * SR / size
    for s, scale_s, db, centre_hz, octaves in table:
        shape = 1 / (1 + (np.log2(hz / centre_hz) / octaves) ** 2)
        noise = rms_one(irfft(shape * rfft(rng.standard_normal(size))))
        swell = 1 / (1 + ((TIME - s) / scale_s) ** 2 / 4) ** 2
        out += from_db(db) * np.resize(noise, N) * swell
    return out * rms_one(from_db(grain_db * drift(700)))


def hands():
    """Hands and sleeve brush by; fingers shifting on the hammer excite its handle and head."""
    # brushes and grips: (time [s], time scale [s], relative level [dB], centre [Hz], half width [octaves])
    brush_rows = [(4.526, 0.013, -61.5, 2980, 0.78), (4.669, 0.0053, -58, 2630, 0.31),
                  (4.669, 0.0054, -60, 9000, 1.1), (4.745, 0.01, -58, 6000, 4.8),
                  (4.857, 0.021, -56, 1000, 1.5), (4.881, 0.008, -49, 2000, 1.7),
                  (5.415, 0.0092, -66, 3440, 0.9), (6.06, 0.019, -61.5, 2220, 0.47),
                  (6.272, 0.012, -58, 980, 0.98), (6.666, 0.015, -59, 885, 1.2),
                  (6.716, 0.022, -59, 1380, 1.3), (7.057, 0.025, -68, 2170, .6),
                  (9.23, 0.0066, -57, 770, 0.49)]
    grip_rows = [(8.038, 0.01, -69, 2420, 0.54), (8.068, 0.018, -66, 1930, 0.57),
                 (8.336, 0.0096, -63.5, 7000, 0.77), (8.55, 0.022, -73, 5000, 0.85),
                 (8.64, .01, -73, 7950, 1.0), (8.75, 0.1, -75, 5000, 1.3), (8.805, .05, -73, 2990, .03)]
    # handle and head: (frequency [Hz], width [Hz], boost [dB])
    hammer_body = [(883, 50, 19), (1910, 60, 13), (2390, 100, 10.5), (3530, 70, 10), (5170, 143, 11),
                   (8150, 150, 6)]
    return rubs(brush_rows) + resonances(rubs(grip_rows), hammer_body)


def workshop(x, wet_db=-12.5, size=32768):
    """Diffuse room tail of band-passed noise, each band with its own decay, longest in the bass."""
    # reverberation: (frequency [Hz], t60 [s])
    decay_times = [(100, 1), (400, .5), (1500, 0.22), (5000, 0.14), (14000, 0.27)]
    t, edges_hz, tail = TIME[:size], np.geomspace(40, 18000, num=10), 0
    for low_hz, high_hz in zip(edges_hz, edges_hz[1:]):
        t60_s = at_hz(decay_times, np.sqrt(low_hz * high_hz))
        tail = tail + band(rng.standard_normal(size), low_hz, high_hz) * np.exp(-np.log(1000) * t / t60_s)
    tail *= t > .004
    return x + from_db(wet_db) * signal.oaconvolve(x, tail / np.linalg.norm(tail))[:N]


def room_tone():
    """Faint steady air: filtered noise whose soft drone gives way to a deeper rumble."""
    # air at first and later: (frequency [Hz], relative density [dB])
    early_air = [(40, -32), (80, -7.5), (130, -1), (210, -6.5), (300, -17), (480, -14.5), (700, -18.5),
                 (1200, -24), (3000, -25), (8000, -29.5), (15800, -35)]
    late_air = [(25, -14), (65, 0.5), (120, 1), (180, -15), (250, -4.5), (320, -12.5), (450, -16),
                (1000, -19), (3000, -20.5), (8000, -27.5), (15800, -33)]
    # drone: (frequency [Hz], width [Hz], boost [dB])
    drone_peaks = [(216.5, 6, 10.5), (487, 7, 12)]
    air_db = -68.5
    late = np.interp(TIME, [5.79, 5.82], [0, 1])
    drone = resonances(colour(hiss(), early_air), drone_peaks)
    return from_db(air_db) * ((1 - late) * drone + late * colour(hiss(), late_air))


def scene():
    """Saw, switches, handling and room tone, alike in both channels."""
    handling = knocks() + drag() + hands()
    mono = saw() + workshop(switches() + handling) + room_tone()
    return np.array([mono, mono])


def record(dry):
    """Elliptic low-pass: the top is cut steeply."""
    cutoff_hz = 15900
    return signal.sosfilt(signal.ellip(12, .1, 80, cutoff_hz, fs=SR, output="sos"), dry)


dry = scene()
out = record(dry)
waveform_to_disk(out)
```